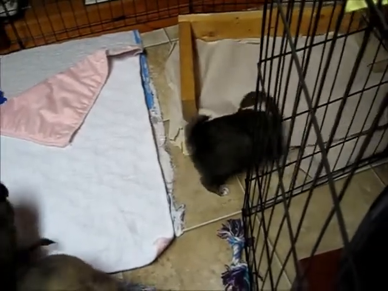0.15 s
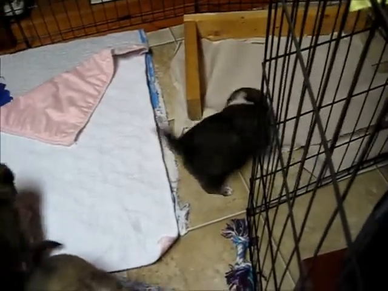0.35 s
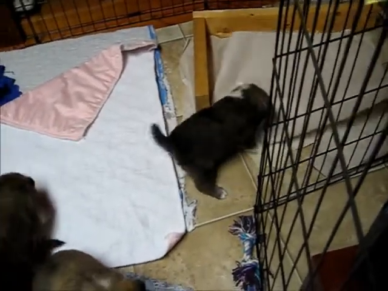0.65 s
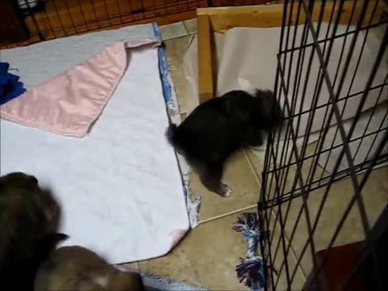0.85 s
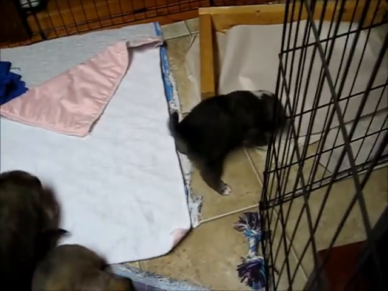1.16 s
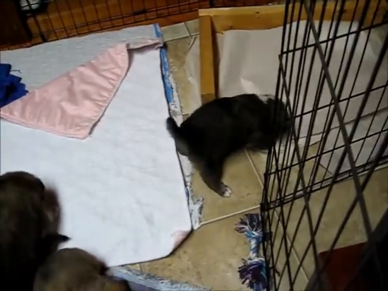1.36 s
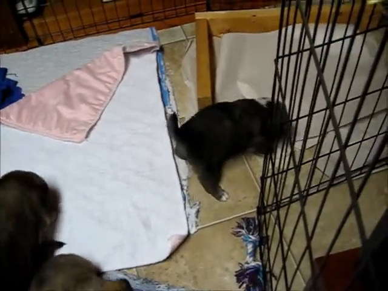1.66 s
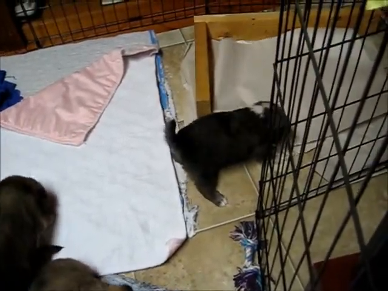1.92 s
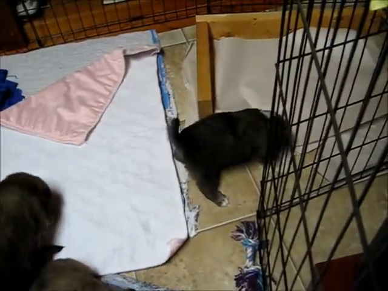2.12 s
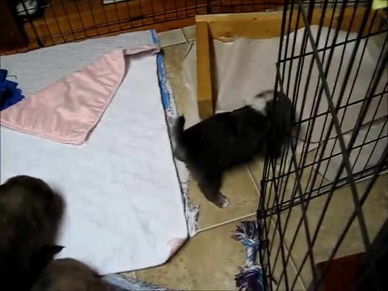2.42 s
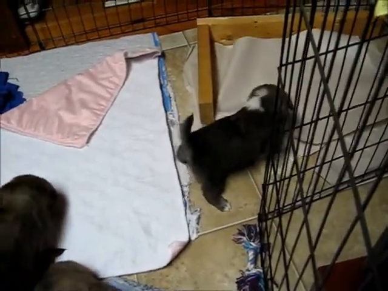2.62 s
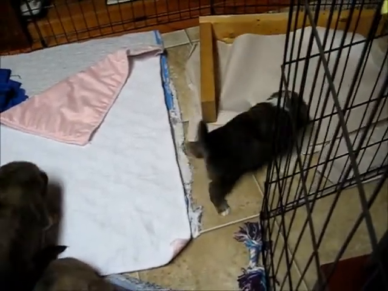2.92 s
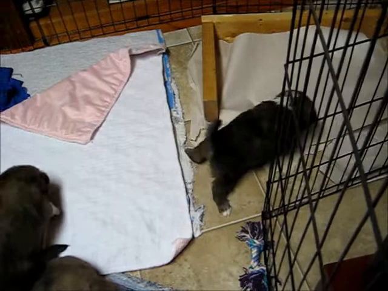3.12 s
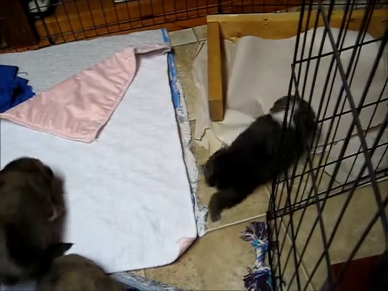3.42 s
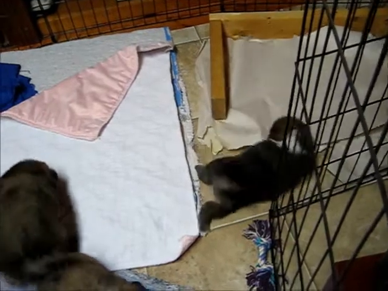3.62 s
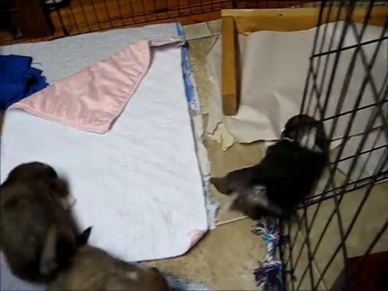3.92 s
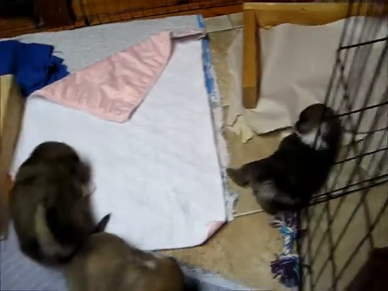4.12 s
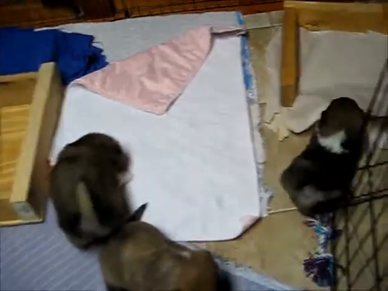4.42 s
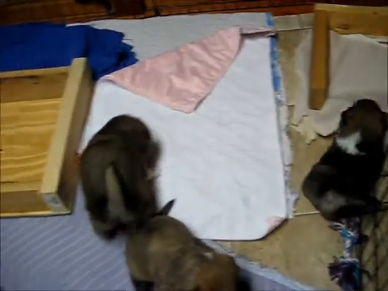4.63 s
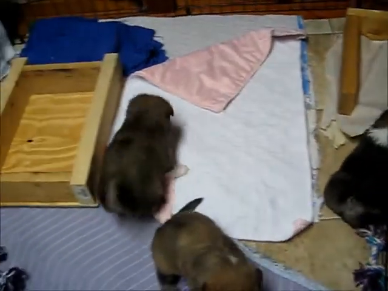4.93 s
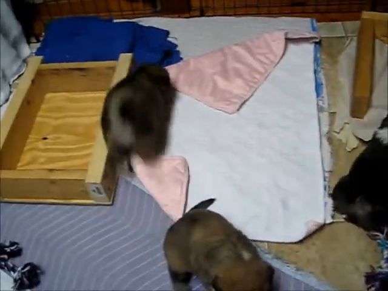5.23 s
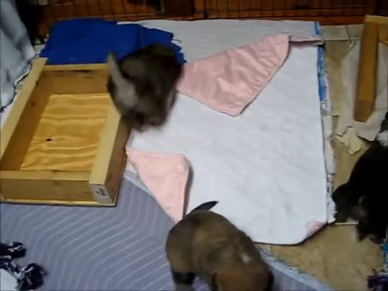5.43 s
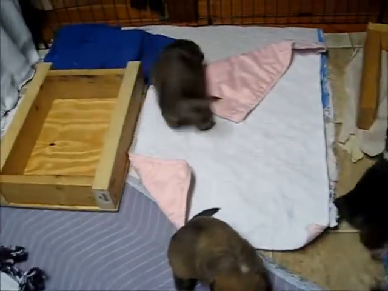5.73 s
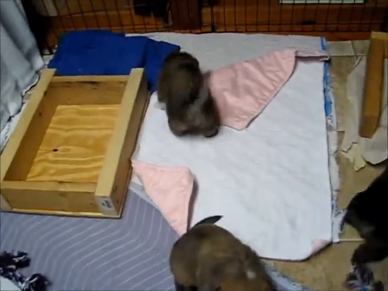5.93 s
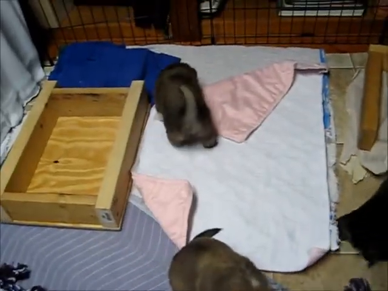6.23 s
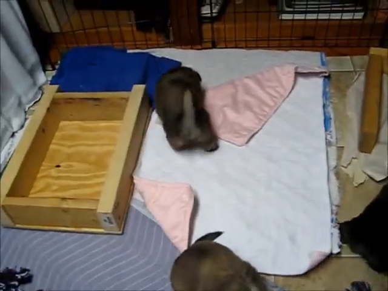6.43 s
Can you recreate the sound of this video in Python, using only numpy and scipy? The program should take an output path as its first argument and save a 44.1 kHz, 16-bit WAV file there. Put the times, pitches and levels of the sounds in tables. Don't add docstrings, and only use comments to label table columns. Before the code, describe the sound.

Puppies scrabble over crinkling paper and padded sheets on a tile floor, claws ticking and paws thudding in uneven bursts in a small hard room.

```python
import sys
import numpy as np
from scipy import signal
from scipy.fft import rfft, irfft, next_fast_len
from scipy.io import wavfile

SR = 44100
rng = np.random.default_rng(int(sys.argv[2]) if len(sys.argv) > 2 else 0)


def waveform_to_disk(signal):
    frames = np.transpose(np.atleast_2d(signal))
    scaled = np.clip(frames, -1, 1) * 32767
    samples = np.round(scaled).astype(np.int16)
    wavfile.write(sys.argv[1], SR, samples)


def level_to_linear(level):
    exponent = np.asarray(level, float) / 20
    return 10 ** exponent


N = 289296

# (time [s], peak [dB], ring [Hz], top crack re peak [dB])
CREASES = [(0.249, -8, 2540, -48), (0.578, -8.5, 4090, -15), (0.63, -1.5, 4930, -21),
           (0.819, -8.5, 2120, -39), (1.021, -23.5, 3000, -20), (1.775, -12.5, 2350, -43),
           (1.781, -13.5, 3450, -41), (2.066, -13.5, 4570, -24), (2.415, -14, 2570, -38),
           (2.698, -7.5, 2680, -26), (3.792, -13, 2920, -21), (4.282, -16, 3600, -27),
           (4.355, -5.5, 3130, -27), (4.798, -13.5, 4000, -12), (4.801, -12, 2880, -18),
           (5.251, -6.5, 3100, -33), (5.255, -6, 3100, -35), (5.306, -8, 2900, -26),
           (5.308, -11, 3970, -24), (5.339, -13, 2550, -30), (5.404, -4.5, 5430, -10),
           (5.623, -8, 3960, -3), (6.045, -15, 2420, -16), (6.17, -3, 4540, -16), (6.324, 0, 2460, -14)]
# (time [s], peak [dB], ring [Hz], top crack re peak [dB])
CLAWS = [(0.023, -15, 5570, -18), (0.051, 0.5, 3540, -21), (0.383, -6, 4630, -18), (0.589, -8, 4100, -10),
         (0.623, -0.5, 4600, -12), (0.602, 2.5, 4440, -14), (0.867, -8, 2570, -42), (1.431, -17, 4440, -27),
         (2.058, -4.5, 3440, -12), (2.343, -3.5, 3450, -11.5), (2.986, -18, 2410, -9),
         (3.643, -6, 4600, -22), (3.713, -10.5, 3200, -30), (3.773, -6.5, 2520, -35),
         (3.997, -5, 3160, -44), (4.159, -3.5, 3900, -14), (4.260, -6, 3500, -28), (4.694, -19, 2370, -24),
         (4.716, -15, 2360, -16), (4.811, -9.5, 2800, -19), (4.895, -9.5, 2930, -30),
         (4.972, -0.5, 3180, -10.5), (5.144, -16, 2700, -13), (5.767, -11.5, 5200, -16),
         (5.798, -18.5, 2020, -13), (6.103, -7.5, 3050, -16), (6.449, -12.5, 4040, -16),
         (6.55, -16.5, 2260, -25)]
# (time [s], peak [dB], ring [Hz], pad thud re peak [dB])
PATS = [(0.354, -23, 3370, -22), (1.179, -23.5, 2030, -14), (1.371, -6, 3960, -20),
        (1.374, -1.5, 3950, -13), (1.719, -18, 2600, -7), (2.135, -11, 3560, -14.5),
        (2.315, -9.5, 3700, -4), (2.595, -16, 3440, -18), (2.958, -26, 1870, -4), (3.37, -16.5, 2420, -11),
        (5.202, -16.5, 2550, -13), (5.352, -10, 3230, -13), (5.39, -8, 2630, -12.5),
        (5.464, -6.5, 2320, -12.5), (5.491, -13.5, 2350, -22), (5.979, -17, 2940, -11.5),
        (6.256, -7.5, 2380, -7.5), (6.271, -8, 3360, -8)]
# (time [s], peak [dB], ring [Hz], pad thud re peak [dB])
SHOVES = [(0.055, -9, 3530, -9), (0.189, -19, 4060, -11), (0.243, -20, 3000, -6), (0.283, -15, 3500, -13),
          (0.404, -8.5, 3220, -17), (0.446, -22, 3910, -8), (0.462, -12.5, 3380, -8.5),
          (0.559, -16, 2660, -9), (1.049, -12, 3320, -11), (1.064, -1, 3540, -12.5),
          (2.443, -13.5, 2550, -3), (4.059, -14, 2920, -29), (4.163, -18.5, 2290, -6.5),
          (4.262, -32, 3480, -12), (4.873, -12, 2700, -8), (4.931, -11.5, 2100, -24),
          (4.975, -12, 3100, -30)]
# (time [s], peak [dB], ring [Hz])
TICKS = [(0.071, -5.5, 3180), (0.596, -4, 3800), (0.787, -12, 2950), (0.803, -19, 2010), (0.923, -15, 4190),
         (1.058, -17, 3700), (1.389, -12, 3540), (1.636, -31, 2730), (2.097, -14, 4030), (2.28, -30, 2060),
         (2.284, -12, 2370), (2.478, -12, 3600), (3.206, -23.5, 1870), (3.661, -25, 2850),
         (3.806, -9.5, 2900), (4.3, -9, 3420), (4.308, -8, 4150), (4.373, -13, 4270), (4.411, -9, 2490),
         (4.506, -14.5, 4650), (4.941, -14, 2120), (4.992, -8.5, 2840), (5.266, -11, 2580),
         (5.408, -7, 3500), (6.174, -5, 3900), (6.182, -2.5, 2500), (6.196, -13, 2350), (6.215, -10, 3140),
         (6.287, -7.5, 2970), (6.386, -13.5, 1930), (6.304, -5.5, 3020), (3.753, -15, 3280),
         (4.349, -16, 3000), (2.694, -10, 3660)]
# (time [s], peak [dB], ring [Hz])
SCRATCHES = [(0.0604, -5, 3500), (0.21, -14, 2350), (0.3406, -19, 3370), (0.5357, -28, 3450),
             (0.7262, -18, 4570), (0.7775, -6, 2980), (0.811, -9, 2600), (0.84, -28, 2460),
             (1.6, -24.5, 2730), (2.1819, -25, 5370), (2.2347, -15, 2150), (2.399, -16, 2580),
             (2.6648, -37, 2460), (2.6783, -19, 4220), (2.752, -22, 3390), (3.0014, -21, 2150),
             (3.028, -16, 2670), (3.0879, -20, 2300), (3.354, -26, 2720), (3.615, -20, 3280),
             (3.7962, -10, 3400), (3.991, -19, 3600), (4.2088, -16, 2340), (4.607, -14.5, 2700),
             (4.7412, -13, 4620), (4.749, -12.5, 3500), (5.1255, -22, 2570), (5.525, -16.5, 3290),
             (5.5774, -26, 1740), (5.5914, -24, 2100), (5.618, -17, 2400), (5.674, -12, 2010),
             (5.692, -12.5, 2200), (5.753, -21, 4800), (5.827, -29, 2080), (6.21, -7, 2540),
             (6.2214, -1, 2300), (6.3477, -7.5, 2310), (6.41, -18, 1850), (6.488, -12, 2130)]
# (time [s], peak [dB], ring [Hz])
FLICKS = [(0.2828, -21, 4160), (0.7687, -8, 3400), (1.1884, -20, 2390), (1.663, -26, 3500),
          (1.6646, -21, 2070), (1.9534, -34, 2500), (2.4437, -10, 4740), (2.62, -17, 3900),
          (2.807, -19, 4990), (4.2724, -20, 3010), (4.882, -20, 3080), (5.381, -19, 3040),
          (5.5504, -19, 3300), (5.6314, -13, 3130), (0.5906, 0, 3000), (3.7745, -21, 3580),
          (2.7, -10, 2400)]
# (time [s], peak [dB], body [Hz])
STEPS = [(1.049, -7.5, 1500), (1.061, -9, 1620), (1.372, -18, 940), (2.443, -13, 1050), (2.443, -43, 250),
         (2.53, -23, 890), (2.956, -20, 1330), (2.696, -26, 880), (4.061, -23, 900), (5.772, -23, 930),
         (5.625, -11, 1050), (5.573, -16, 1590), (5.597, -18, 1300), (0.443, -13, 1570),
         (2.487, -15.5, 880), (2.595, -19.5, 896), (2.598, -20.5, 530), (2.63, -36, 298),
         (2.881, -23.5, 850), (0.06, -14, 1130), (2.701, -34, 300), (2.681, -21, 1500), (3.099, -44, 220),
         (3.207, -25.5, 890), (4.39, -45, 200), (4.973, -46, 180), (5.465, -47, 170), (5.566, -23, 695),
         (5.594, -21, 750), (5.661, -37, 400), (5.719, -34, 226), (5.839, -50, 230), (0.368, -21, 1150),
         (0.403, -9.5, 1580), (1.635, -29.5, 910), (1.717, -31, 434), (2.135, -21, 1510),
         (4.604, -29, 1240), (4.873, -37, 890), (4.98, -23, 1150), (5.388, -21, 890), (5.7, -33, 600),
         (5.829, -28, 960), (6.256, -23, 1210), (6.484, -22.5, 885)]
# (full force reached [s], rustle [dB], hold [s], pad weight re rustle [dB])
SLIDES = [(0.068, -25.5, 0.013, -13), (0.253, -32.5, .01, -6.5), (0.401, -35, 0.081, -7),
          (0.61, -23.5, 0.015, -14), (0.789, -24.5, 0.0059, -25), (0.864, -34, 0.11, -10.5),
          (1.38, -39, .01, -28), (1.688, -48, 0.15, 2.5), (2.06, -35.5, 0.0093, -10.5),
          (2.28, -27.5, 0.016, -21), (2.431, -34, 0.1, -8.5), (2.722, -45, 0.0057, 3),
          (3.008, -37.5, 0.0087, -9), (3.103, -45.5, 0.11, -3.5), (3.39, -43.5, 0.041, -4.5),
          (3.663, -26, 0.0097, -11.5), (3.8, -28.5, 0.011, -18), (3.917, -32, .01, -22),
          (4.108, -35, 0.012, -11), (4.299, -31, 0.14, -10.5), (4.482, -32.5, 0.078, -17),
          (4.822, -35, 0.012, -30), (4.982, -25.5, 0.0051, -8), (5.26, -36, 0.22, -3.5),
          (5.566, -40, 0.058, 2.5), (5.67, -40.5, 0.013, -16), (6.199, -24, 0.014, -12),
          (6.338, -29.5, 0.0078, -4), (6.547, -55, .02, -10)]
# (full force reached [s], film [dB], hold [s])
SKIDS = [(0.42, -39, 0.021), (0.735, -38.5, 0.016), (1.386, -50, 0.017), (2.344, -50, 0.017),
         (2.81, -50, 0.011), (2.987, -42, 0.037), (3.427, -44.5, 0.087), (4.385, -39.5, 0.19),
         (4.76, -40, 0.038), (5.41, -60, .02), (5.635, -50, 0.019)]
# (time [s], rustle [dB])
STIR = [(0, -51), (.7, -45), (0.99, -43), (1.16, -43.5), (1.23, -37), (1.52, -40.5), (1.57, -50),
        (1.9, -45.5), (2.15, -40.5), (2.65, -38), (3.21, -43), (3.25, -54), (3.33, -46.5), (3.45, -38.5),
        (4.2, -42.5), (5.1, -38), (5.93, -44.5), (6.56, -34.5)]
# (frequency [Hz], density [dB per Hz])
PAD = [(60, -50), (150, -27), (350, -13), (700, -3), (1100, 0), (1600, -4), (4000, -40)]
# (frequency [Hz], density [dB per Hz])
PAPER = [(300, -28.5), (1500, -4), (2500, 1.5), (4300, 0), (6200, -3.5), (9000, -44), (14000, -32)]
# (frequency [Hz], density [dB per Hz])
FILM = [(4500, -20), (7000, 0), (10000, -5), (12500, -15), (16000, -24)]
# (frequency [Hz], t60 [s])
ROOM = [(300, 0.51), (800, 0.16), (2500, 0.15), (6000, 0.033), (14000, 0.24)]
# (frequency [Hz], density [dB per Hz])
NOISE_FLOOR = [(18, -40), (30, -2.5), (319, 2), (526, 3.5), (760, -1), (940, 4.5), (1150, -21),
               (2010, -5), (7090, -25), (7670, -34), (8740, -7.5), (9970, 3.5), (12600, -11), (14800, -13),
        (16000, -14)]
# (frequency [Hz], peak [dB])
WHINE = [(120, -69), (7560, -54), (7860, -62), (15090, -75), (15120, -70), (15150, -65), (15734, -81)]

CLAW_T60_S, CREASE_T60_S, PAT_T60_S, SHOVE_T60_S = 0.044, 0.13, 0.074, 0.13
TICK_T60_S, SCRATCH_T60_S, FLICK_T60_S = 0.05, 0.055, 0.01
DRY_THUD_DB, TICK_THUD_DB = -29.5, -18.5
PAT_CRACK_DB, SHOVE_CRACK_DB, TICK_CRACK_DB = -16, -16.5, -30
FOLLOW_DB, FIRST_RUSH, RUSH_S = -18.5, 0.73, 0.0098
SOFT_SNAP, SOFT_RISE_S, SOFT_DB = 0.45, 0.0012, -2.5
BOX_HZ, BOX_WIDTH_HZ, BOX_SHARE = 940, 41, 1.4
STIR_WEIGHT_DB = -10.5
GRIP_DB_PER_S, RELEASE_DB_PER_S = 230, 163
FILM_DB, FILM_FOLLOWS = -50, 0.67
HISS_DB = -47.5
CUTOFF_HZ = 15800


def rms_one(x):
    return x / np.sqrt(np.mean(x ** 2) + 1e-20)


def peak_one(x):
    return x / np.max(np.abs(x))


def at_hz(points, hz):
    table_hz, value = np.transpose(points)
    return np.interp(np.log(hz + 1), np.log(table_hz), value)


def colour(x, spectrum):
    size = next_fast_len(len(x))
    gain = level_to_linear(at_hz(spectrum, np.fft.rfftfreq(size, 1 / SR)))
    return rms_one(irfft(rfft(x, size) * gain, size)[:len(x)])


def drift(rate_hz):
    r = np.exp(-2 * np.pi * rate_hz / SR)
    noise = rng.standard_normal(N + SR)
    return rms_one(signal.lfilter([1], [1, -2 * r, r * r], noise)[SR:])


def grains(per_s, spread_db, size):
    mark, strength, sign = np.moveaxis(rng.random(size + (3,)), -1, 0)
    level_db = -spread_db * np.log(np.maximum(strength, .004))
    return (mark < per_s / SR) * level_to_linear(level_db) * np.sign(sign - .5)


def resonance(x, hz, width_hz):
    r = np.exp(-np.pi * width_hz / SR)
    poles = [1, -2 * r * np.cos(2 * np.pi * hz / SR), r * r]
    return signal.lfilter([(1 - r * r) / 2, 0, (r * r - 1) / 2], poles, x)


def contacts():
    rows = [(s, db, hz, DRY_THUD_DB, crack, CLAW_T60_S, False) for s, db, hz, crack in CLAWS]
    rows += [(s, db, hz, DRY_THUD_DB, crack, CREASE_T60_S, False) for s, db, hz, crack in CREASES]
    rows += [(s, db, hz, thud, PAT_CRACK_DB, PAT_T60_S, False) for s, db, hz, thud in PATS]
    rows += [(s, db, hz, thud, SHOVE_CRACK_DB, SHOVE_T60_S, False) for s, db, hz, thud in SHOVES]
    rows += [(s, db, hz, TICK_THUD_DB, TICK_CRACK_DB, TICK_T60_S, True) for s, db, hz in TICKS]
    rows += [(s, db - 4.5, hz, TICK_THUD_DB, TICK_CRACK_DB, SCRATCH_T60_S, True)
             for s, db, hz in SCRATCHES]
    rows += [(s, db, hz, DRY_THUD_DB, TICK_CRACK_DB, FLICK_T60_S, False) for s, db, hz in FLICKS]
    return rows


def snaps():
    length = SR // 8
    t = np.arange(length) / SR
    events = contacts()
    crumples = grains(9000, spread_db=1.5, size=(len(events), length))
    paper_band = signal.butter(3, [1300, 7000], "band", fs=SR, output="sos")
    film_band = signal.butter(2, [6200, 12500], "band", fs=SR, output="sos")
    out = np.zeros(N + length)
    for (s, peak_db, hz, thud_db, crack_db, t60, soft), crumple in zip(events, crumples):
        rush = 1 + FIRST_RUSH * np.exp(-t / RUSH_S)
        push = level_to_linear(FOLLOW_DB) * crumple * level_to_linear(-60 * t / t60) * rush
        if soft:
            push = push * np.minimum(t / SOFT_RISE_S, 1)
            peak_db = peak_db + SOFT_DB
        push[0] = SOFT_SNAP if soft else 1
        ring = resonance(push, hz, 0.47 * hz) - level_to_linear(-16.0) * push
        sheet = signal.sosfilt(paper_band, ring)
        pad_and_tray = resonance(push, 1070, 650) + BOX_SHARE * resonance(push, BOX_HZ, BOX_WIDTH_HZ)
        thud = resonance(pad_and_tray, 700, 1350)
        crack = signal.sosfilt(film_band, push * level_to_linear(-60 * t / 0.11))
        sound = level_to_linear(-.5) * peak_one(sheet)
        sound = sound + level_to_linear(thud_db - 2.5) * peak_one(thud)
        sound = sound + level_to_linear(crack_db + .5) * peak_one(crack)
        at = round(s * SR)
        out[at:at + length] += level_to_linear(peak_db) * sound
    return out[:N]


def steps():
    t = np.arange(SR // 8) / SR
    rubs = grains(2500, spread_db=-2.0, size=(len(STEPS), len(t)))
    out = np.zeros(N + len(t))
    for (s, peak_db, hz), rub in zip(STEPS, rubs):
        push = rub * np.minimum(t / 0.001, 1) * level_to_linear(-60 * t / 0.1)
        push[0] = 3.1
        body = resonance(resonance(push, hz, 0.8 * hz), 1.2 * hz, 1.6 * hz)
        at = round(s * SR)
        out[at:at + len(t)] += level_to_linear(peak_db - 1.0) * peak_one(body)
    return out[:N]


def stroke(t, s, peak_db, hold):
    grip_db = GRIP_DB_PER_S * np.maximum(s - t, 0)
    release_db = RELEASE_DB_PER_S * np.maximum(t - s - hold, 0)
    return level_to_linear(2 * (peak_db - grip_db - release_db))


def sliding():
    t = np.arange(0, N, 32) / SR
    stir = level_to_linear(2 * np.interp(t, *np.transpose(STIR)))
    paper = stir + sum(stroke(t, s, db, hold) for s, db, hold, _ in SLIDES)
    pad = stir * level_to_linear(2 * STIR_WEIGHT_DB)
    pad = pad + sum(stroke(t, s, db + weight, hold) for s, db, hold, weight in SLIDES)
    film = level_to_linear(2 * FILM_DB) * (paper * level_to_linear(80)) ** FILM_FOLLOWS
    film = film + sum(stroke(t, *skid) for skid in SKIDS)
    return [np.interp(np.arange(N) / SR, t, 10 * np.log10(power)) for power in (paper, pad, film)]


def rustle():
    rustle_db, pad_db, film_db = sliding()
    weight_db, crisp_db = pad_db - rustle_db, film_db - rustle_db
    clumps = level_to_linear(rustle_db + drift(44))
    pad = colour(grains(3000, spread_db=2.2, size=(N,)), PAD) * level_to_linear(weight_db + drift(20))
    paper = colour(grains(9000, spread_db=2.0, size=(N,)), PAPER)
    film = colour(grains(13000, spread_db=-3.0, size=(N,)), FILM) * level_to_linear(crisp_db + 2.0 * drift(25))
    return clumps * (pad + paper + film)


def tail():
    t = np.arange(SR // 2) / SR
    edges = 125 * 2. ** np.arange(8)
    out = 0
    for low, high in zip(edges, edges[1:]):
        octave = signal.butter(2, [low, high], "band", fs=SR, output="sos")
        band = signal.sosfilt(octave, rng.standard_normal(len(t)))
        out = out + band * level_to_linear(-60 * t / at_hz(ROOM, np.sqrt(low * high)))
    out = out * np.clip(t / 0.0051, 0, 1)
    return out / np.sqrt(np.sum(out ** 2))


def room(x, count=8):
    place = np.arange(N) / SR / .11 % count
    out = 0
    for k in range(count):
        away = np.abs((place - k + count / 2) % count - count / 2)
        share = np.cos(np.pi / 2 * np.minimum(away, 1))
        out = out + signal.fftconvolve(x * share, tail())[:N]
    return out


def noise_floor():
    t = np.arange(N) / SR
    lines = sum(level_to_linear(db) * np.sin(2 * np.pi * hz * t + .3 * drift(3)) for hz, db in WHINE)
    return level_to_linear(HISS_DB) * colour(rng.standard_normal(N), NOISE_FLOOR) + lines


def scene():
    near = snaps() + steps()
    slide = rustle()
    echo = room(level_to_linear(-10.0) * near + level_to_linear(-12.0) * slide)
    return (near + level_to_linear(1.0) * slide + echo + noise_floor())[None]


def roll_off(x):
    return signal.sosfilt(signal.butter(12, 16500, fs=SR, output="sos"), x)


def record(dry):
    rounded = np.clip(1.8 * np.tanh(dry / 1.8), -.86, .86)
    low_pass = signal.ellip(9, .3, 40, CUTOFF_HZ, fs=SR, output="sos")
    mix = signal.sosfilt(low_pass, rounded)
    return roll_off(mix)


dry = scene()
out = record(dry)
waveform_to_disk(out)
```